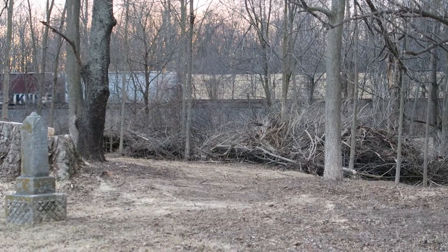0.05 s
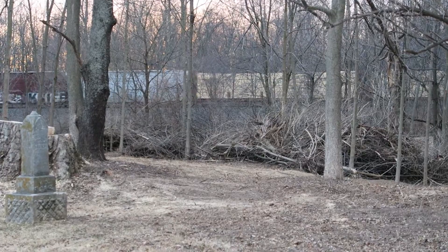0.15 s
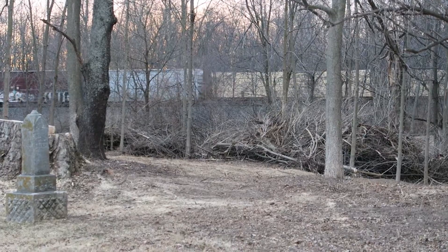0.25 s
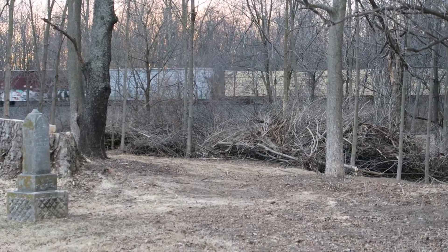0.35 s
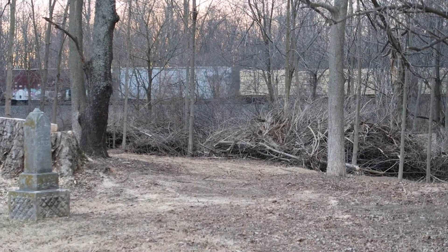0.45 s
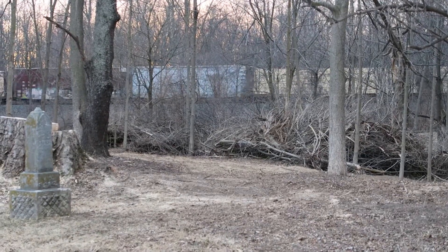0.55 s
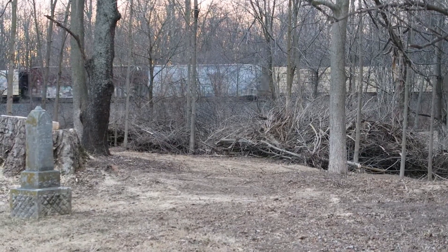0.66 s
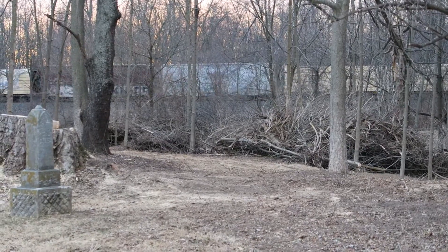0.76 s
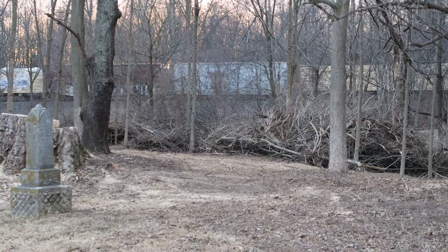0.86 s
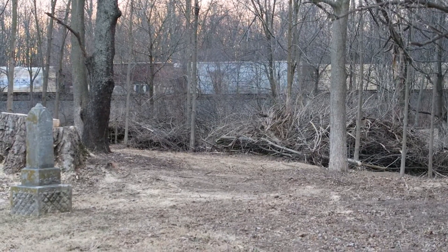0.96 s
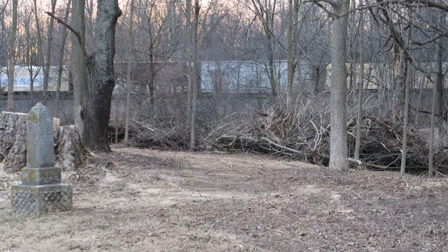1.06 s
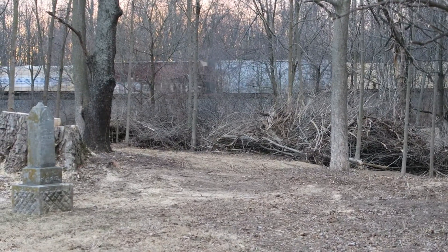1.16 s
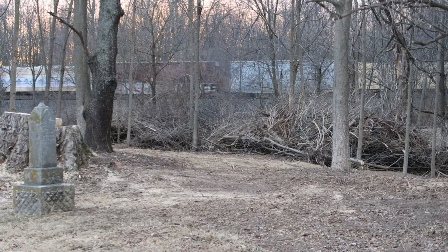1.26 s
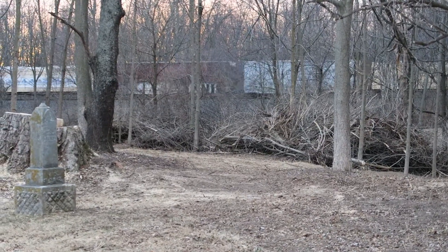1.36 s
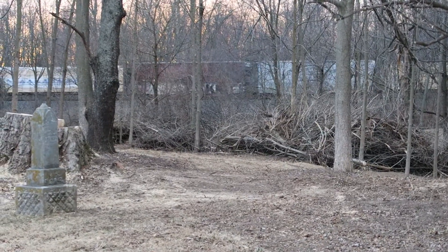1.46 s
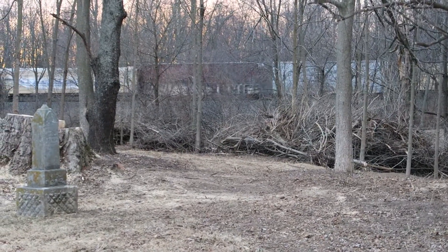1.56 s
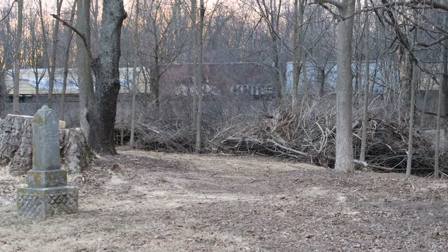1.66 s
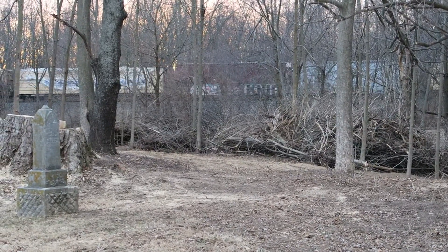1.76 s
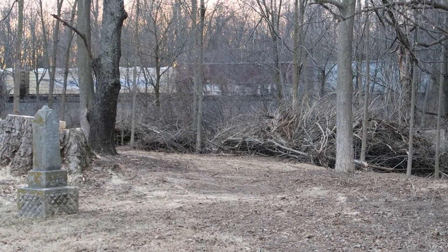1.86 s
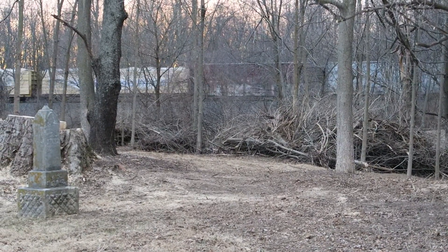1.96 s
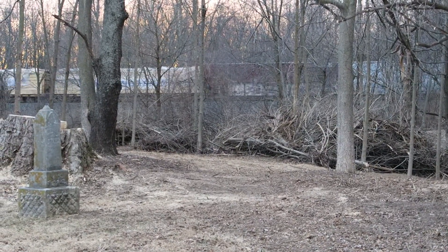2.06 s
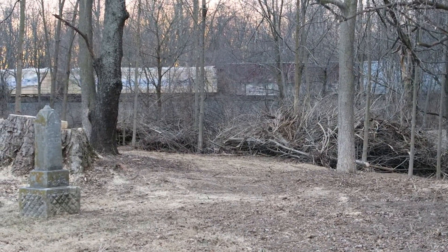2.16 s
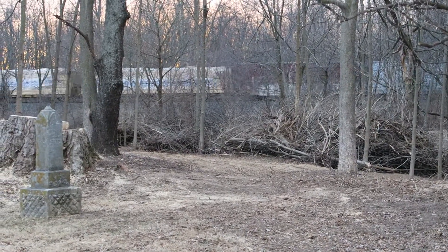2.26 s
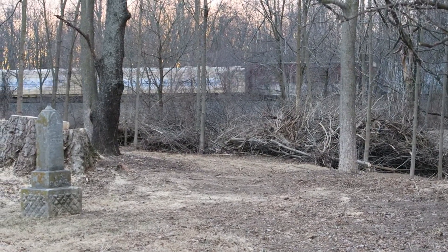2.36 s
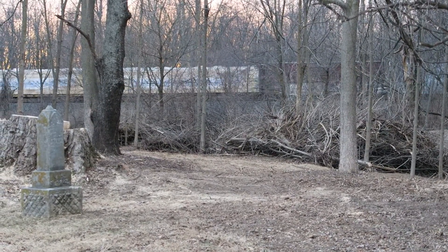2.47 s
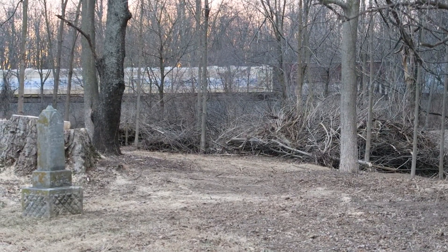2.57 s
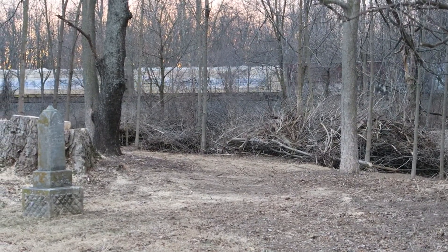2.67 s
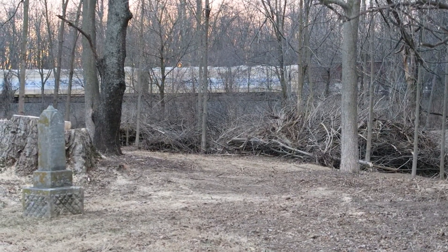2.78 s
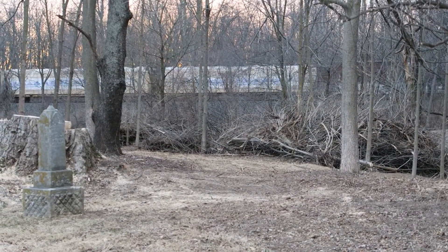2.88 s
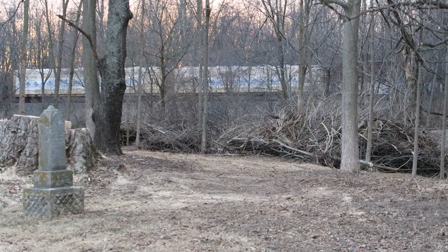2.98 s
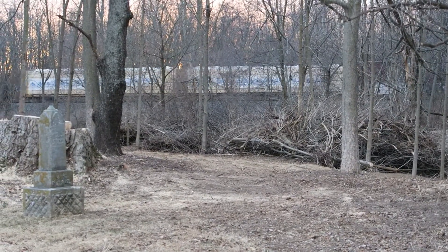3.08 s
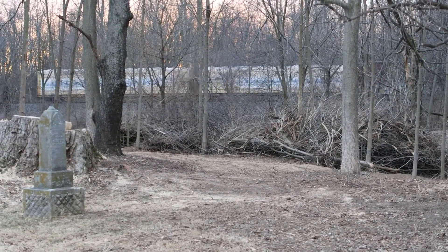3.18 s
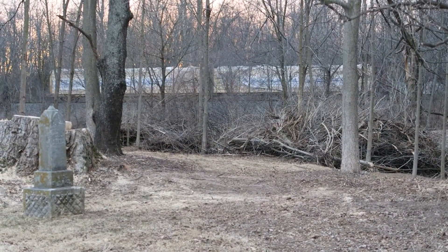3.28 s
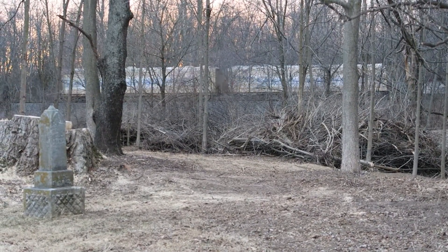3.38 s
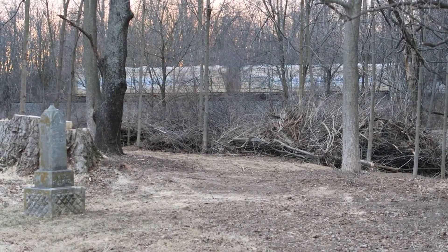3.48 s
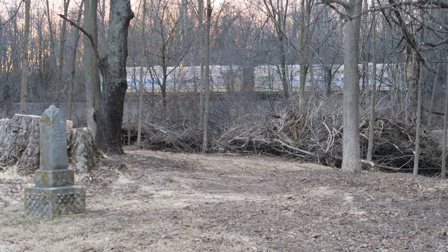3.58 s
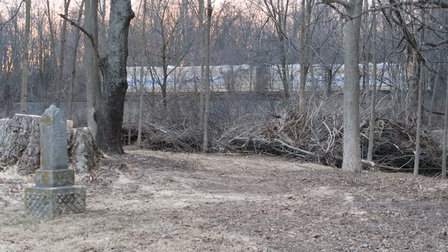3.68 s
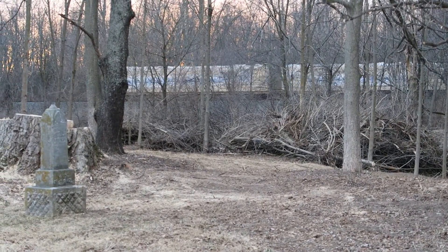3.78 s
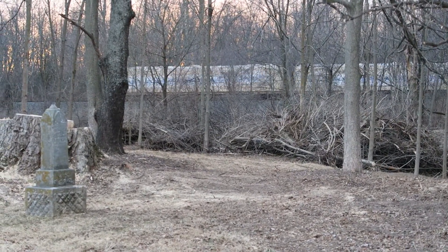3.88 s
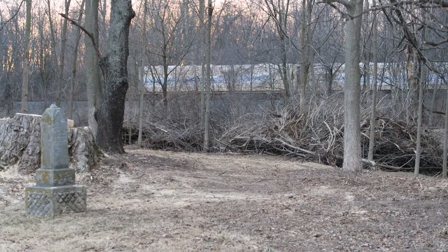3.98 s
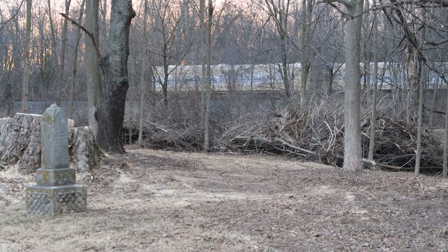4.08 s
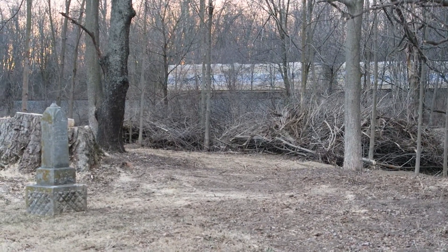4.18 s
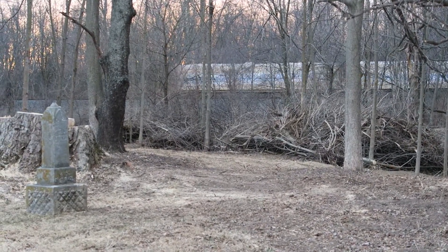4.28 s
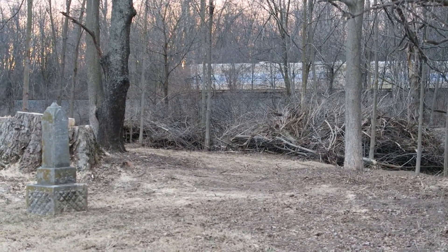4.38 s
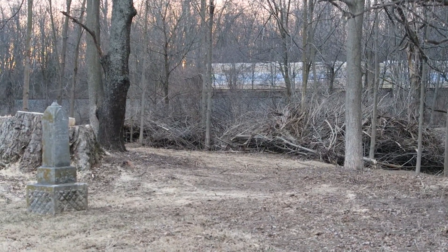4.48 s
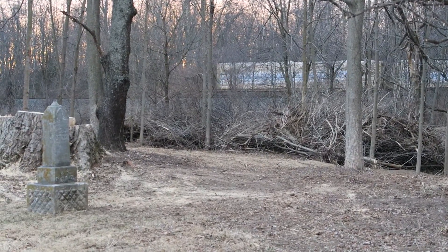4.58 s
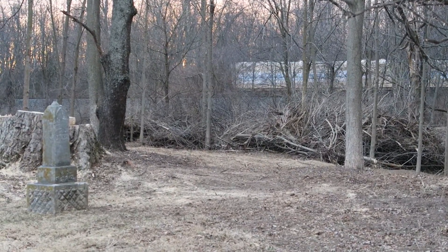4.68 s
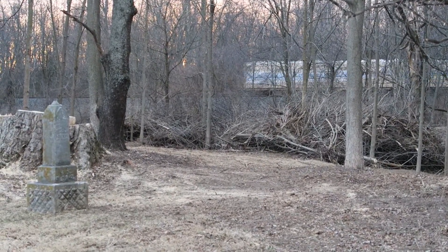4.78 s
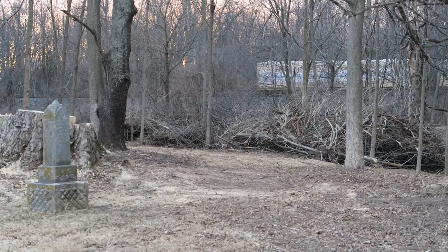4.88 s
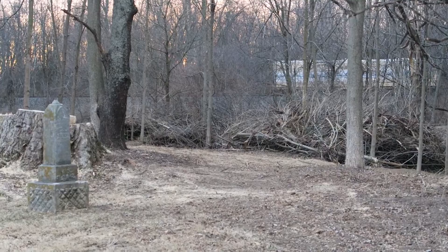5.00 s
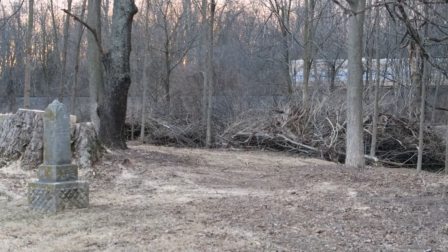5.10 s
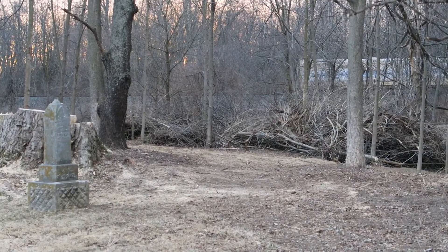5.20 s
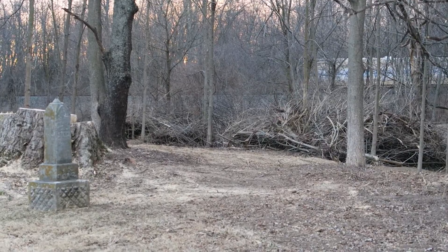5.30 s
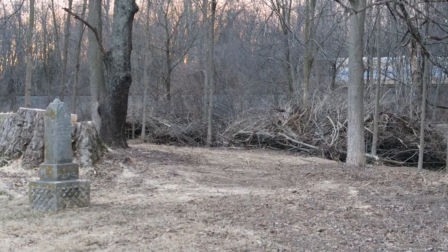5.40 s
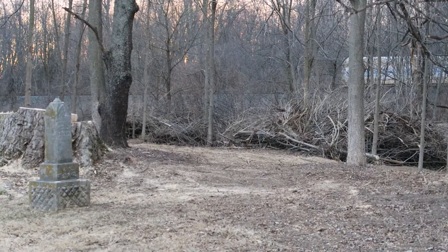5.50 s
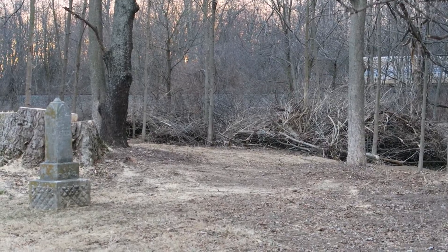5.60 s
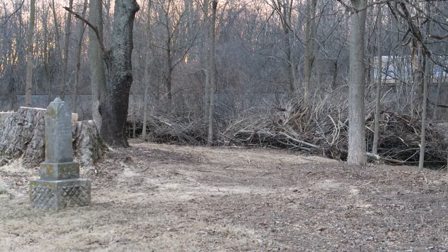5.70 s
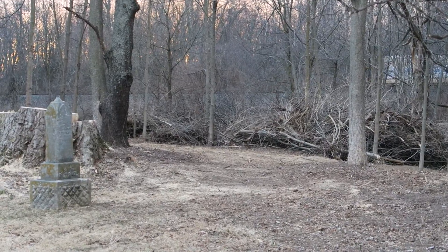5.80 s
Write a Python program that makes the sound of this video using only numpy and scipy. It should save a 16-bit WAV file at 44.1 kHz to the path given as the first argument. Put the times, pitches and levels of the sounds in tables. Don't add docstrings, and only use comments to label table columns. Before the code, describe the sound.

A long freight train rolls past behind bare woods with a deep booming rumble and steady rail roar, fading as the last wagon leaves.

```python
import sys
import numpy as np
from scipy import signal
from scipy.fft import rfft, irfft, next_fast_len
from scipy.io import wavfile
from scipy.ndimage import uniform_filter1d, map_coordinates

SR = 44100
rng = np.random.default_rng(int(sys.argv[2]) if len(sys.argv) > 2 else 0)


def gain_from_db(level_db):
    decades = np.asarray(level_db, float) / 20
    return 10 ** decades


def wrap_up_sound(samples):
    columns = np.atleast_2d(samples).T
    tamed = np.clip(columns, -1, 1)
    steps = np.round(tamed * 32767).astype(np.int16)
    wavfile.write(sys.argv[1], SR, steps)


N = 257984

# t/s, level/dB
TRAIN_LEVEL = [(0, -1.5), (.5, 1.5), (1.1, 1.5), (1.7, 3.5), (2.3, 0.5), (2.9, 3), (3.5, 1.5), (4.2, 1),
               (4.6, -0.5), (4.95, -.5), (5.2, -3), (5.55, -5.5), (5.85, -7)]
# f/Hz, level/dB per Hz
RAIL_COLOUR = [(120, -36), (210, 0.5), (255, -3.5), (500, -2.5), (570, 0), (680, 0.5), (900, -7),
               (1100, -14.5), (1500, -47.5), (2500, -110)]
# f/Hz, level/dB per Hz
WHEEL_COLOUR = [(600, -45), (900, -3.5), (1100, -1), (1320, -7), (1880, -7), (2130, -13), (2600, -10.5),
                (3050, -19), (3400, -19), (4000, -33.5), (5000, -58), (7000, -120)]
# f/Hz, level/dB per Hz
HISS_COLOUR = [(2800, -44.5), (3800, 1.5), (4400, -3), (5500, -14), (6100, -17.5), (6700, -23), (8000, -34),
               (9000, -39), (12500, -55), (15000, -64.5), (16500, -94)]
# f/Hz, level/dB per Hz
RUMBLE_COLOUR = [(18, -35.5), (30, -26.5), (42, -5), (58, -5.5), (67, 0), (79, -10.5), (88, -0.5),
                 (110, -4.5), (150, -11.5), (200, -22), (280, -46.5), (400, -93.5)]
RAIL_DB, WHEELS_DB, HISS_DB, GROUND_DB = -23.5, -31.5, -55, -18
RAIL_GROWS, WHEELS_GROWS, HISS_GROWS, GROUND_GROWS = 0.89, 1.01, 0.9, 0.91

# t/s, half length/s, hiss lift/dB
GRINDS = [(.42, .08, 0.5), (.6, 0.031, -0.5), (1.06, 0.051, 2), (1.63, .05, 0.5), (2.33, .1, 1.5),
          (2.58, .05, 1), (2.83, .05, 3.5), (2.91, .04, 3), (4.03, 0.04, 1.5), (4.8, 0.037, 3),
          (4.92, 0.036, 0.5), (5.68, 0.023, 4.5), (5.8, .03, 3.5)]
GRIND_IN_WHEELS, GRIND_IN_RAIL = 0.24, 0.43
GRIND_EDGE_HZ, GRIND_EDGE_DB = 8200, 2

# t/s, f/Hz
FIRING_PITCH = [(0, 73.5), (2.9, 73.45), (3.1, 73.3), (5.85, 73.25)]
# t/s, level/dB
ENGINE_LEVEL = [(0, -13.5), (.6, -13.5), (.9, -17), (1.9, -13), (2.6, -14.5), (3.2, -14.5), (3.7, -13.5),
                (4.0, -16.5), (4.4, -12.5), (4.8, -19), (5.1, -16), (5.45, -21), (5.85, -32)]
# t/s, depth/dB
LULLS = [(.05, 4), (0.171, 12), (.47, 4), (.72, 1.5), (1.04, 8.5), (1.22, 5), (1.56, 3), (1.88, 2),
         (2.02, 7), (2.2, 11.5), (2.43, 10), (2.68, 9), (3.08, 9.5), (3.28, 0), (3.49, 7), (3.81, 4),
         (4.43, 1.5), (4.61, 10.5), (4.9, 10), (5.14, 4.5), (5.33, 8.5), (5.589, 19.5)]
LULL_S = 0.037

# t/s, half length/s, f/Hz, glide/Hz, level/dB
SQUEAKS = [
    (.33, .04, 6150, 0, -69),
    (.395, .035, 7755, 0, -66),
    (.46, .04, 7740, 0, -75),
    (1.635, .01, 9000, 600, -75),
    (2.29, .025, 2650, 0, -45),
    (2.535, .015, 2480, 0, -37),
    (2.57, .04, 2620, 0, -40),
    (2.77, .03, 2635, 30, -40),
    (2.88, .02, 2540, 0, -43),
]
LEFT_UNTIL_S, LEFT_DB = 0.5, 20
# t/s, peak level/dB
TICKS = [
    (3.71, -58),
    (4.615, -41),
]

# f/Hz, side-to-mid level/dB
PORT_SPREAD = [(40, -47.5), (94, -36.5), (150, -31), (230, -22), (370, -8.5), (580, -14), (910, -13),
               (1440, -10.5), (2260, -15), (3560, -13), (4500, -9), (6000, -6), (8000, -10.5)]
# f/Hz, phase/rad
LEFT_LEAD = [(60, 0.027), (430, -0.3), (1500, -.2), (3700, -.1)]
# f/Hz, level/dB
LEFT_TILT = [(50, 0.9), (72, 0.47), (120, 0), (300, -0.2), (1500, -0.8), (8000, 0)]
# f/Hz, level/dB per Hz
PORT_NOISE = [(2000, -30), (4500, -2), (6100, -1), (6800, -5), (8000, -6), (12400, -13), (12900, -21),
              (14000, -18), (16500, -60)]
# t/s, drop/dB
DUCKS = [(.117, 2), (.639, 3.5), (1.123, 1.5), (1.4, 3.5), (1.558, 1), (1.829, 0.5), (1.944, 1.5),
         (2.074, 1.5), (2.345, 1), (2.605, 1), (2.938, 4.5), (3.39, 2), (3.736, 2.5), (4.466, 3), (5.0, 1)]
DUCK_S, RECOVER_S = 0.005, 0.34
OWN_FOLLOWS = 0.7


def unit(x):
    return x / np.sqrt(np.mean(x ** 2) + 1e-20)


def along(points, hz):
    f, value = np.transpose(points)
    return np.interp(np.log(hz + 1), np.log(f + 1), value)


def curves(rows):
    s, *columns = np.transpose(rows)
    return [np.interp(np.arange(N) / SR, s, column) for column in columns]


def bumps(rows):
    t = np.arange(N) / SR
    return sum(height * np.exp(-((t - s) / half) ** 2) for s, half, height in rows)


def wobble(rate):
    knots = rng.standard_normal(int(N * rate / SR) + 4)
    return map_coordinates(knots, [np.arange(N) * rate / SR])


def filtered(x, response):
    m = next_fast_len(x.shape[-1] + SR // 4)
    shaped = rfft(x, m) * response(np.fft.rfftfreq(m, 1 / SR))
    return irfft(shaped, m)[..., :x.shape[-1]]


def rush(colour, patchy_db):
    cells = signal.stft(rng.standard_normal((2, N + 2 * SR)), nperseg=512)[2]
    patches = uniform_filter1d(rng.standard_normal(cells.shape[1:]), size=6, axis=0)
    patches = uniform_filter1d(patches, size=12, axis=1)
    pair = signal.istft(cells * gain_from_db(patchy_db * unit(patches)), nperseg=512)[1]

    def mid_side_gain(hz):
        return gain_from_db(along(colour, hz) + [0 * hz, along(PORT_SPREAD, hz) - 3])

    mid, side = filtered(pair, mid_side_gain)[:, SR:SR + N]
    return unit(np.array([mid + side, mid - side]))


def wagons():
    flutter = wobble(22.03)
    train_db = curves(TRAIN_LEVEL)[0]
    grind_db = bumps(GRINDS)

    rail_db = RAIL_DB + RAIL_GROWS * train_db + GRIND_IN_RAIL * grind_db + 0.35 * flutter
    wheels_db = WHEELS_DB + WHEELS_GROWS * train_db + GRIND_IN_WHEELS * grind_db + 0.66 * flutter
    hiss_db = HISS_DB + HISS_GROWS * train_db + grind_db + 0.36 * flutter
    rail = gain_from_db(rail_db) * rush(RAIL_COLOUR, patchy_db=0.4)
    wheels = gain_from_db(wheels_db) * rush(WHEEL_COLOUR, patchy_db=0.86)
    hiss = gain_from_db(hiss_db) * rush(HISS_COLOUR, patchy_db=-0.5)

    def edge_gain(hz):
        ratio = hz / GRIND_EDGE_HZ
        return gain_from_db(GRIND_EDGE_DB) * ratio ** 2 / (1 + (ratio / 2) ** 2)

    grind_edge = (gain_from_db(grind_db) - 1) * filtered(hiss, edge_gain)
    return rail + wheels + hiss + grind_edge


def ground():
    level_db = GROUND_DB + GROUND_GROWS * curves(TRAIN_LEVEL)[0]
    return gain_from_db(level_db) * rush(RUMBLE_COLOUR, patchy_db=0.38)


def diesel():
    firing = 2 * np.pi * np.cumsum(curves(FIRING_PITCH)[0]) / SR
    uneven = 1 + 0.38 * np.cos(firing / 8)
    lull_db = bumps([(s, LULL_S, depth_db) for s, depth_db in LULLS])
    level_db = curves(ENGINE_LEVEL)[0] - lull_db
    return gain_from_db(level_db) * np.sqrt(2) * uneven * np.cos(firing)


def squeaks():
    out = np.zeros((2, N))
    t = np.arange(N) / SR
    for s, half, hz, glide_hz, db in SQUEAKS:
        u = (t - s) / half
        pan_db = LEFT_DB * (s < LEFT_UNTIL_S)
        turns = hz * (t - s) + glide_hz * half * u ** 2 / 4
        note = np.exp(-u ** 2) * np.sin(2 * np.pi * turns)
        out += gain_from_db([[db + pan_db / 4], [db - pan_db]]) * note
    return out


def twigs():
    out = np.zeros(N)
    t = np.arange(900) / SR
    for s, db in TICKS:
        splinters = gain_from_db(-1.5 - 60 * t / 0.025) * rng.standard_normal(len(t))
        snap = 3.1 * (t == 0)
        out[round(s * SR):][:len(t)] += gain_from_db(db + 9) * (splinters + snap)
    band = signal.butter(3, [2800, 6000], "band", fs=SR, output="sos")
    return signal.sosfilt(band, out)


def gain_control():
    start, drop_db = np.transpose(DUCKS)
    since = np.maximum(np.arange(N) / SR - start[:, None], 0)
    dip = (1 - np.exp(-since / DUCK_S)) * np.exp(-since / RECOVER_S)
    return -drop_db @ dip


def scene():
    air = wagons() + ground() + diesel() + squeaks() + twigs()
    half = np.array([[0.5], [-0.5]])

    def port_response(hz):
        return gain_from_db(half * along(LEFT_TILT, hz)) * np.exp(1j * half * along(LEFT_LEAD, hz))

    edge = 4096
    padded = np.pad(air, ((0, 0), (edge, edge)), "reflect")
    return filtered(padded, port_response)[:, edge:edge + N]


def roll_off(x):
    return signal.sosfilt(signal.butter(12, 14170, fs=SR, output="sos"), x)


def record(dry):
    gain_db = gain_control()
    own_db = OWN_FOLLOWS * (gain_db + curves(TRAIN_LEVEL)[0]) + 0.6 * wobble(16) - 69.5
    own_noise = filtered(rng.standard_normal((2, N)), lambda hz: gain_from_db(along(PORT_NOISE, hz)))
    own = gain_from_db(own_db) * unit(own_noise)
    ducked = dry * gain_from_db(gain_db)
    rounded = ducked / (1 + np.abs(ducked / 0.75) ** 5) ** (1 / 5)
    return roll_off(rounded + own)


dry = scene()
out = record(dry)
wrap_up_sound(out)
```